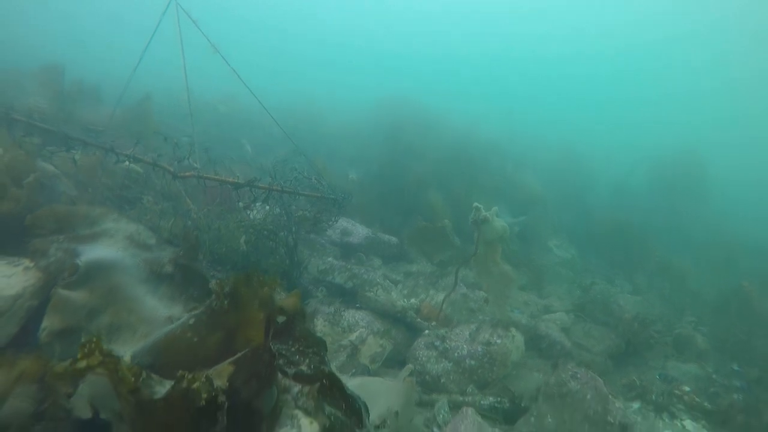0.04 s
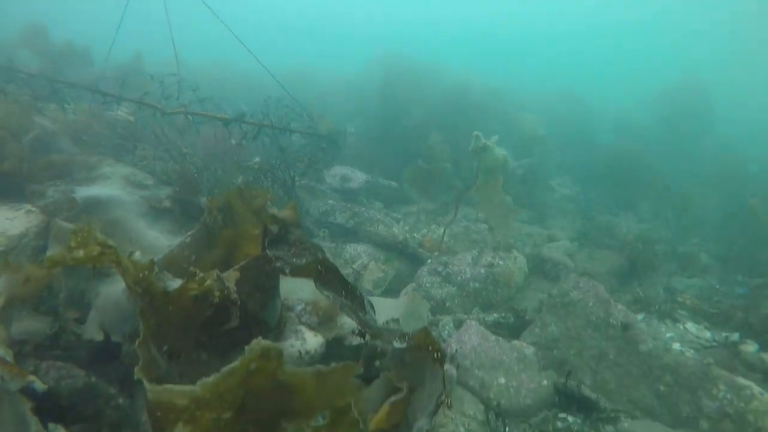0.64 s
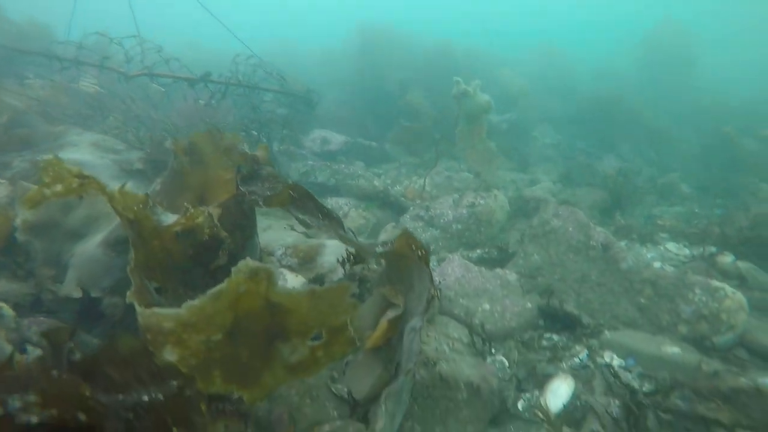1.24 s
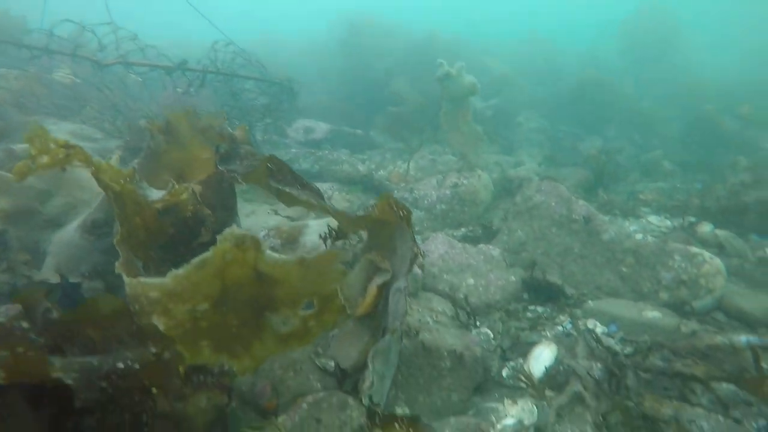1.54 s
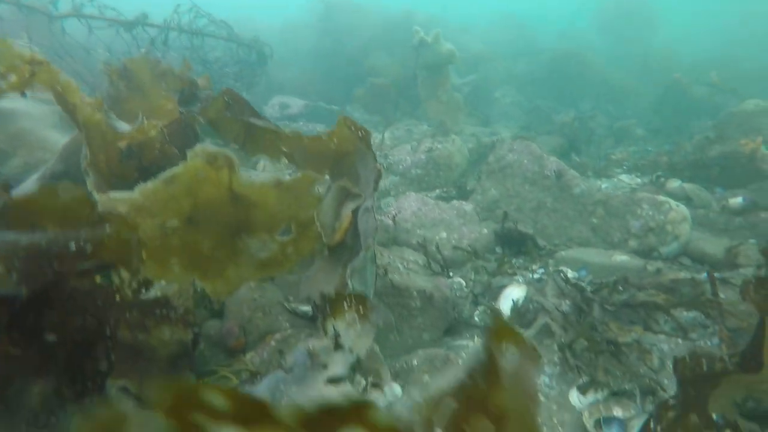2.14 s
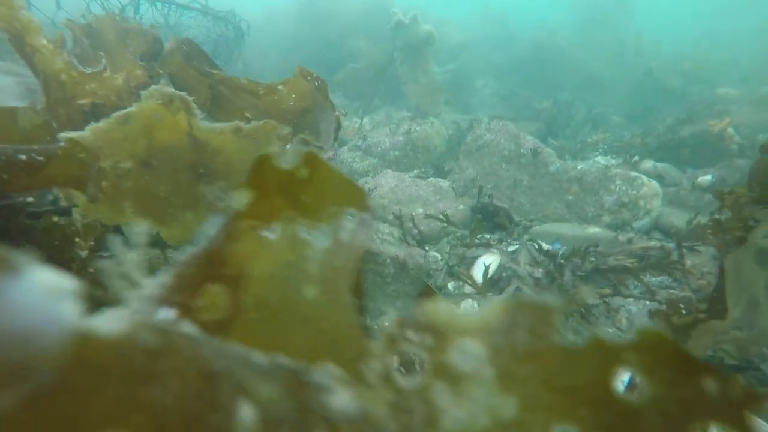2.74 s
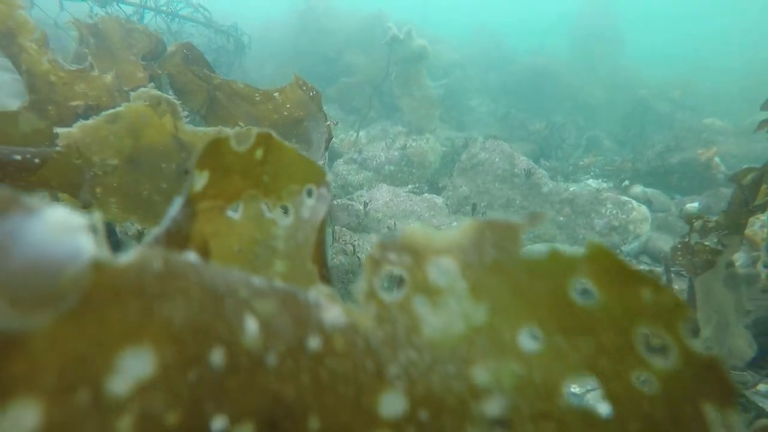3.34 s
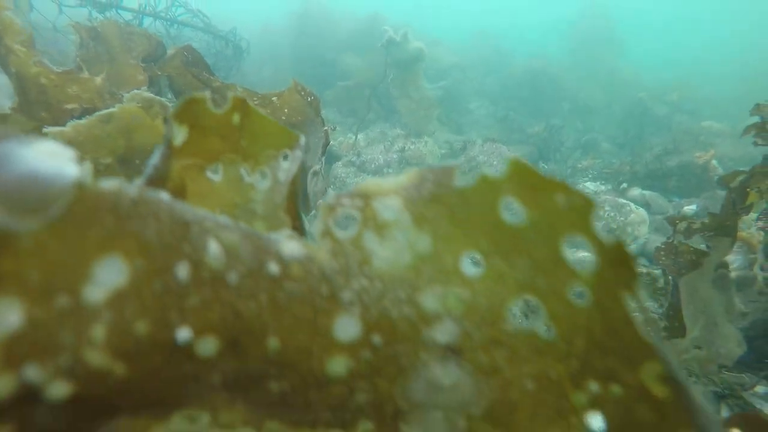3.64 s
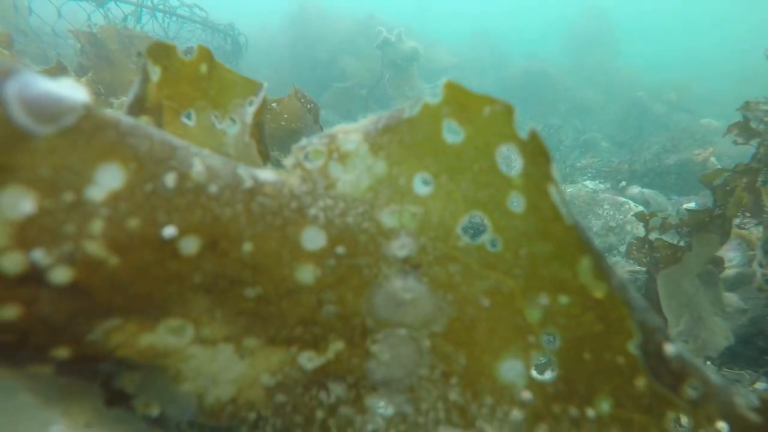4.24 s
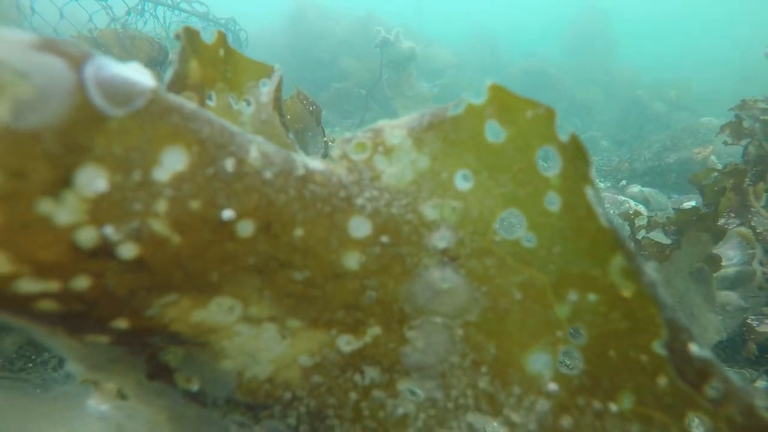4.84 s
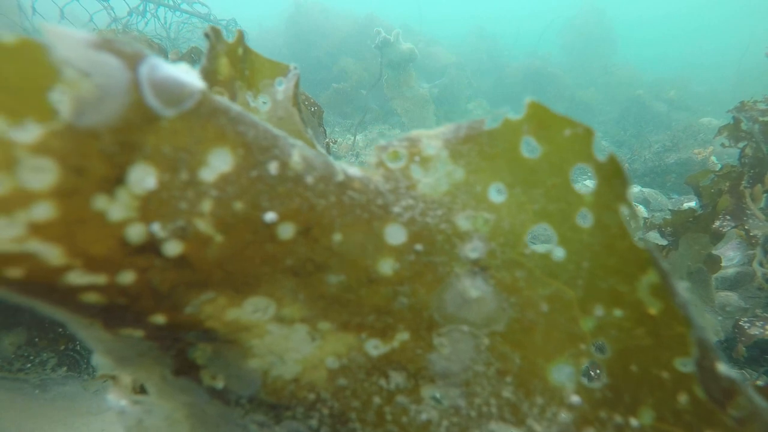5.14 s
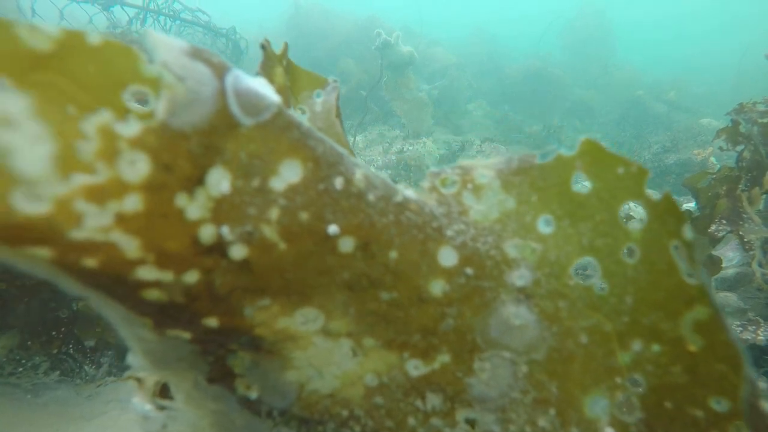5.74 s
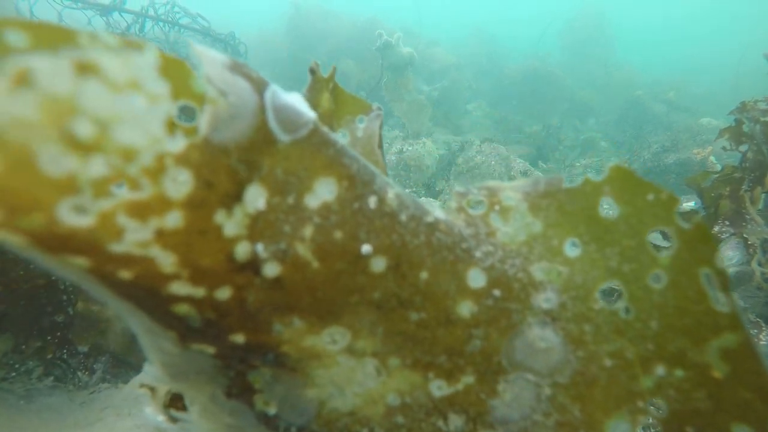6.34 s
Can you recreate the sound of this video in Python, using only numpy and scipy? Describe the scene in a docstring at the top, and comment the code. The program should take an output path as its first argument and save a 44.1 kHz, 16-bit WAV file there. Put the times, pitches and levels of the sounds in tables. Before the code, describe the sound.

Heard from inside a sealed underwater housing, a camera sways over a rocky seabed with low rumbles, soft thumps and faint ticks of grit. The shell scrapes lightly over rock and kelp, then lands with a heavy, booming knock and a second sharp snap against stone. The rumble dies down, leaving a faint hollow hiss, a thin high whine, one soft thump and a few small clicks.

```python
"""A camera pushed through kelp

Heard from inside its sealed housing, a camera rig sways and rumbles over a rocky seabed.
Its shell rings as it scrapes and bumps on stones. It lands with a heavy knock, sand crunches,
and a small hard fitting snaps against stone. Grit ticks and two small bubbles ring.
Under it all are a faint hiss, coloured by trapped air, and a thin whine that pulses once a frame."""
import sys
import numpy as np
from scipy import signal
from scipy.fft import rfft, irfft
from scipy.io import wavfile
from scipy.ndimage import uniform_filter1d

SR = 44100
rng = np.random.default_rng(int(sys.argv[2]) if len(sys.argv) > 2 else 0)


def bounce(signal):
    """Save signal as a 16-bit WAV file at the path given by the first command-line argument."""
    frames = np.transpose(np.atleast_2d(signal))
    limited = np.clip(frames, -1, 1)
    pcm = np.round(limited * 32767).astype(np.int16)
    wavfile.write(sys.argv[1], SR, pcm)


N = 282681
TIME = np.arange(N) / SR

# Jolts that swing the rig on its mount: (time [s], level [dB], pitch [Hz], rise time [s])
JOLTS = [(0.02, -25.5, 61.5, .005), (0.105, -28.5, 64, 0.0038), (0.697, -16, 66.5, 0.023),
         (0.783, -15, 71, 0.046), (0.96, -26.5, 44.8, 0.0065), (1.65, -31, 61.6, 0.029),
         (1.897, -18, 63.4, 0.01), (2.639, -8, 108, .006), (2.6445, -3.5, 53, .003),
         (2.682, -1, 21.9, 0.0087), (2.846, -6.5, 25.5, 0.00067), (2.842, -18, 72, 0.014),
         (3.93, -36.5, 80, 0.012), (4.18, -24, 67, 0.055), (5.6, -40.5, 68.4, .01)]
# How hard the rig sways, one list before landing and one after: (time [s], relative level [dB])
SWAY_LEVELS = [
    [(0.0, -29.5), (0.78, -53), (0.95, -36.5), (1.15, -50), (1.88, -39), (1.9, -33), (2.5, -33.5),
     (2.58, -39)],
    [(3.03, -41), (3.81, -58), (3.99, -50), (4.06, -70), (4.24, -44), (4.31, -57.5), (5.61, -62.5),
     (6.3, -59.5)],
]
# Tone of the swaying rumble: (frequency [Hz], relative level [dB])
SWAY_COLOUR = [(12, -29), (22, 7.5), (29, 2.5), (40, -1.5), (70, -5), (110, -23), (170, -32.5),
               (320, -34.5), (600, -57.5), (1500, -124)]
# Bumps on the shell: (time [s], level [dB], brightness [Hz], slide time [s])
SHELL_BUMPS = [(0.122, -45.5, 1200, .01), (0.392, -44.5, 2110, 0.0098), (0.712, -49.5, 2400, 0.0072),
               (0.977, -49, 2670, 0.0065), (1.861, -45, 1700, 0.0056), (2.194, -40, 2050, 0.0067),
               (2.258, -48, 1700, .005), (2.606, -38, 350, 0.0043), (2.636, -33, 1320, 0.0023),
               (2.648, -14, 3500, .0012), (2.811, -30.5, 1430, 0.014), (2.838, -35.5, 397, 0.0057),
               (3.11, -43, 1060, 0.013), (3.857, -43.5, 1490, 0.0077), (5.578, -43.5, 1400, 0.01)]
# Notes the shell rings at: (pitch [Hz], relative level [dB], time to fade by 60 dB [s])
SHELL_NOTES = [(233, -10, .1), (352, -15, .06), (570, -17, .06), (790, 2, .032), (950, -4, .02),
               (1152, -14, .03), (1560, -5, .026), (1717, -13, .03), (1927, -13, .035), (2110, -12, .016),
               (2570, -7, .02), (3120, -8, .015), (3720, -10, .012), (4430, -8, .011), (5100, -19, .011),
               (7400, -17, .008)]
# The fitting hitting stone: (time [s], level [dB], brightness [Hz], slide time [s])
FITTING_SNAPS = [(2.8396, -22, 10500, .0012)]
# Notes of the fitting: (pitch [Hz], relative level [dB], time to fade by 60 dB [s])
FITTING_NOTES = [(2050, -14, .014), (2700, -11, .011), (3410, 0, .014), (3800, -5, .008), (4250, -8, .01),
                 (5100, -8, .011), (6250, -9, .008), (6650, -9, .008), (7450, -20, .008), (8450, -18, .007),
                 (10450, -14, .009), (11050, -15, .009), (12700, -18, .006)]
# The camera shifting in its seat: (time [s], level [dB], brightness [Hz], slide time [s])
CAMERA_SHIFTS = [(1.959, -46.5, 810, 0.0026), (3.063, -42.5, 550, 0.0022), (3.439, -48.5, 726, .003),
                 (3.897, -51, 800, .003), (4.357, -49, 1080, 0.005), (4.687, -36, 1860, 0.0039),
                 (4.7185, -46, 1400, .0015), (4.7218, -28.5, 1830, 0.0049), (4.973, -44.5, 466, 0.0066),
                 (6.076, -47.5, 795, 0.0018)]
# Notes of the camera in its hollow: (pitch [Hz], relative level [dB], time to fade by 60 dB [s])
CAMERA_NOTES = [(161, -12.5, 0.053), (269, -9.5, 0.03), (538, 5, 0.018), (728, -2, 0.071),
                (1210, -16, 0.049), (1560, -2, 0.021), (1930, 1.5, 0.046), (2630, -1, 0.012),
                (2970, 8.5, 0.01), (3620, -2, 0.016), (6270, 16, 0.0096)]
# The shell dragging over rock and kelp: (start [s], length [s], level [dB], brightness [Hz])
DRAGS = [(0.674, 0.18, -58, 554), (0.972, 0.054, -48, 330), (1.794, 0.24, -53, 1200),
         (2.185, 0.039, -44, 1900), (2.273, 0.11, -39.5, 1690), (2.336, 0.21, -44.5, 1520),
         (2.638, .03, -25.5, 1170), (2.669, 0.073, -40.5, 1330), (3.084, .36, -56, 990),
         (3.933, 0.063, -60.5, 900), (4.154, 0.056, -57, 720), (5.578, 0.076, -58, 400)]
# Tone of the rubbing force: (frequency [Hz], relative level [dB])
RUB_COLOUR = [(50, 1), (120, 21), (230, 4), (400, 7), (600, 1.5), (800, -13), (1200, -1), (2000, -2.5),
              (2700, -6.5), (5000, -3), (12000, -10)]
# Sand crushed under the rig: (time [s], level [dB])
SAND_CRUNCHES = [(2.669, -44.5), (2.714, -55.5), (2.805, -47.5)]
# Tone of the sand: (frequency [Hz], relative level [dB])
SAND_COLOUR = [(500, -8), (1500, 2), (3000, 3), (5500, -12), (9000, -17), (12000, -17), (15000, -25)]
# Small bubbles: (time [s], level [dB], pitch [Hz], rise time [s])
BUBBLES = [(2.462, -30, 762, 0.008), (5.7075, -36.5, 2400, 0.00013)]
# Grit and weed flicking the rig: (time [s], level [dB], pitch [Hz], time to fade by 60 dB [s])
TICKS = [(0.086, -57, 3940, .035), (0.393, -59, 2880, .033), (0.713, -60, 2850, 0.036),
         (0.977, -58, 2800, 0.033), (1.249, -52, 3540, .025), (1.533, -56, 2380, 0.069),
         (2.061, -55, 3600, .012), (4.146, -59.5, 3180, .025), (4.49, -55.5, 1800, .037),
         (5.708, -53, 2870, 0.18)]
# Tone of the steady hiss: (frequency [Hz], level [dB per Hz])
HISS_COLOUR = [(20, -76), (45, -80.5), (100, -86), (200, -93), (400, -93), (850, -107), (1050, -101),
               (2300, -102), (4000, -106), (6400, -107), (8000, -112), (15000, -116)]
# Hollow notes of the air shut in the housing: (pitch [Hz], width [Hz], level [dB])
AIR_NOTES = [(619, 120, -60.5), (796, 286, -68.5), (1907, 106, -66.5)]


def jolts(rest_s=2.99, free_s=3.6, bedded_db=-18):
    """The rig rocks after each jolt; the rocking from the landing dies as it beds down on the stones."""
    bedded = np.interp(TIME, [rest_s - .05, rest_s + 0.11, free_s, free_s + .1], [0, 1, 1, 0])
    return swings(JOLTS, cycles=12.4) * undb(bedded_db * bedded)


def sway(boost_db=2.0):
    """Water and handling push the rig about: a low rumble that follows how hard it moves."""
    rumble = colour(rng.standard_normal(N), SWAY_COLOUR)
    strength = np.sqrt(uniform_filter1d(rumble ** 2, SR // 10))
    return undb(boost_db) * motion() * rumble / strength  # dividing evens out chance swells


def knocks(table, notes, even_slide_s=0.0074):
    """Each knock rings a part with one push and a dying chatter, stronger the longer it slides."""
    out, body, t = np.zeros(N), ring(notes), TIME[:SR // 10]
    for s, db, bright_hz, slide_s in table:
        chatter = slips(len(t), per_s=3000, spread_db=6.0) * np.exp(-t / slide_s)
        strength = (slide_s / even_slide_s) ** 1.6  # at 1, chatter and push are equally strong
        force = strength * chatter / np.linalg.norm(chatter) - signal.unit_impulse(len(t))
        add_burst(out, s, db, signal.fftconvolve(soften(force, bright_hz), body))
    return out


def scrapes(brush_db=-27.5, brush_hz=465, bite_share=0.084, ease_share=0.56):
    """The shell sticks and slips, and so rings: weed brushes it, and each drag bites, then eases off."""
    force = colour(slips(N, per_s=2900, spread_db=4.5), RUB_COLOUR)
    rubbing = signal.fftconvolve(force, ring(SHELL_NOTES))[:N]
    rubbing *= undb(2.5 * wander(per_s=45))  # the level flutters
    out = undb(brush_db) * motion() * unit(soften(rubbing, brush_hz))  # brushing follows the sway
    for s, length_s, db, bright_hz in DRAGS:
        start, count = int(s * SR), int(length_s * SR)
        along = np.linspace(0, 1, count)
        pressure = np.minimum(1, np.minimum(along / bite_share, (1 - along) / ease_share))
        drag = soften(rubbing[start:start + count], bright_hz) * pressure
        add(out, s, undb(db) * unit(drag))
    return out


def sand(rise_s=0.0068, fade_s=0.18):
    """Sand grains crunch each time the rig's weight comes down, then settle."""
    grains = unit(colour(slips(N, per_s=3500, spread_db=-0.5), SAND_COLOUR))
    weight, t = np.zeros(N), TIME[:SR // 2]
    for s, db in SAND_CRUNCHES:
        add(weight, s, undb(db) * np.minimum(t / rise_s, 1) * fade(t, fade_s))
    return grains * weight


def bubbles():
    """Each small bubble rings briefly at one pitch."""
    return swings(BUBBLES, cycles=44)


def ticks():
    """Grit and weed flick against the rig with dry ticks."""
    out = np.zeros(N)
    for s, db, hz, fade_s in TICKS:
        add_burst(out, s, db, crunch(hz, fade_s))
    return out


def crackle(count=70, db=-65, spread_db=3.0, low_hz=1100, high_hz=5000, fade_s=0.013):
    """Fainter ticks from the seabed come at random times and pitches."""
    out = np.zeros(N)
    for when, size, pitch in rng.random((count, 3)):
        hz = low_hz * (high_hz / low_hz) ** pitch
        add_burst(out, when * TIME[-1], db + spread_db * (2 * size - 1), crunch(hz, fade_s))
    return out


def sizzle(hz=4100, width_hz=800, db=-74, half_level_s=1.64):
    """A thin, high sizzle while the rig glides forward, fading as it slows."""
    band = resonate(slips(N, per_s=830, spread_db=5), hz, sharpness=hz / width_hz)
    level = undb(db + 0.77 * wander(per_s=9.2))
    return unit(band) * level / (1 + (TIME / half_level_s) ** 4)


def hiss(waver_db=1.3):
    """A steady hiss, with the hollow notes of the trapped air wavering in it."""
    out = colour(rng.standard_normal(N), HISS_COLOUR) * np.sqrt(SR / 2)
    for hz, width_hz, db in AIR_NOTES:
        note = resonate(rng.standard_normal(N), hz, sharpness=hz / width_hz)
        note = resonate(note, hz, sharpness=hz / width_hz / 3)  # trims noise far from the note
        out += unit(note) * undb(db + waver_db * wander(per_s=1.8))
    return out


def whine(hz=8550, db=-65, frames_per_s=29.97, peak_s=0.0216, width_s=0.0019):
    """The camera's electronics sing for a few milliseconds in every frame."""
    from_peak = TIME % (1 / frames_per_s) - peak_s
    pulse = np.exp(-.5 * (from_peak / width_s) ** 2)
    wobble = 0.28 * wander(per_s=45)
    return undb(db) * pulse * np.sin(2 * np.pi * hz * from_peak + wobble)


def motion():
    """How strongly the rig is being moved, as a gain."""
    times, levels_db = np.vstack(SWAY_LEVELS).T
    return undb(np.interp(TIME, times, levels_db))


def swings(table, cycles):
    """Pure tones that build up, and fade by 60 dB in the given number of cycles."""
    out, t = np.zeros(N), TIME[:SR]
    for s, db, hz, rise_s in table:
        level = undb(db) * (1 - np.exp(-t / rise_s)) * fade(t, cycles / hz)
        add(out, s, level * np.sin(2 * np.pi * hz * t))
    return out


def ring(notes):
    """The sound of one tap: all notes start together and die at their own pace."""
    t = TIME[:SR // 10]
    return sum(undb(db) * fade(t, fade_s) * np.cos(2 * np.pi * hz * t) for hz, db, fade_s in notes)


def crunch(hz, fade_s):
    """A brief, dry burst of grains in a broad band around one pitch."""
    t = TIME[:SR // 8]
    grains = slips(len(t), per_s=6700, spread_db=3) * fade(t, fade_s)
    return resonate(grains, hz, sharpness=3.5)


def slips(count, per_s, spread_db):
    """Tiny slips: clicks of uneven size at random moments."""
    happens = rng.random(count) < per_s / SR
    size = undb(spread_db * rng.standard_normal(count))
    direction = rng.choice([-1, 1], count)
    return unit(happens * direction * size + 1e-12)


def wander(per_s):
    """A random drift, about 1 in size, that heads for a new value per_s times a second."""
    step = int(SR / per_s)
    targets = np.repeat(rng.standard_normal(N // step + 1), step)[:N]
    return unit(uniform_filter1d(targets, step))


def colour(x, points):
    """Shape a sound's tone along a curve of (frequency [Hz], level [dB]) points."""
    hz, db = np.transpose(points)
    frequencies = np.maximum(np.fft.rfftfreq(len(x), 1 / SR), 1)
    gain = undb(np.interp(np.log(frequencies), np.log(hz), db))
    return irfft(rfft(x) * gain, len(x))


def soften(x, hz):
    """A soft contact lets little through above this frequency."""
    return signal.sosfilt(signal.butter(3, min(hz, SR * .45), fs=SR, output="sos"), x)


def resonate(x, hz, sharpness):
    """Keep a band around one pitch; sharper means narrower."""
    return signal.lfilter(*signal.iirpeak(hz, sharpness, fs=SR), x)


def fade(t, fade_s):
    """Die away by 60 dB every fade_s seconds."""
    return undb(-60 * t / fade_s)


def undb(db):
    """Turn decibels into a gain to multiply by."""
    return 10 ** (np.asarray(db) / 20)


def unit(x):
    """Scale to an average power of 1."""
    return x / np.sqrt(np.mean(x ** 2))


def add(out, s, sound):
    """Mix a sound in, starting at s seconds."""
    start = int(s * SR)
    out[start:start + len(sound)] += sound[:N - start]


def add_burst(out, s, db, sound):
    """Mix in a short sound; db is its level if all its energy were packed into 5 ms."""
    add(out, s, undb(db) * sound * np.sqrt(SR / 200) / np.linalg.norm(sound))


def scene():
    """Everything reaches one microphone through the housing."""
    bumps = knocks(SHELL_BUMPS, SHELL_NOTES)
    shifts = knocks(CAMERA_SHIFTS, CAMERA_NOTES)
    snap = knocks(FITTING_SNAPS, FITTING_NOTES)
    contacts = bumps + shifts + snap + ticks() + scrapes() + sand()
    return (jolts() + sway() + contacts + bubbles() + crackle() + sizzle() + hiss() + whine())[None]


def record(dry, top_hz=15200):
    """Cut away the very highest treble."""
    return signal.sosfilt(signal.ellip(8, .2, 70, top_hz, fs=SR, output="sos"), dry)


dry = scene()
out = record(dry)
bounce(out)
```